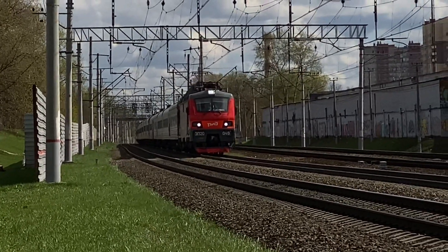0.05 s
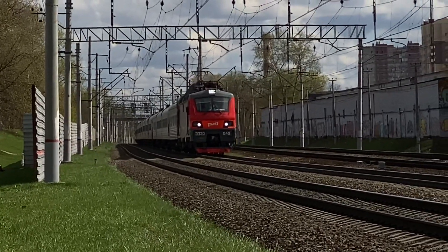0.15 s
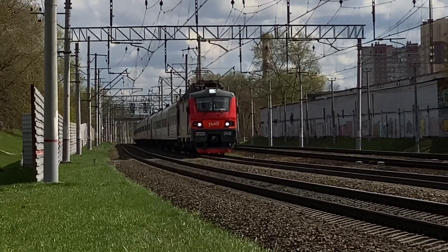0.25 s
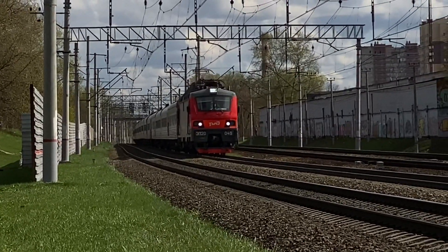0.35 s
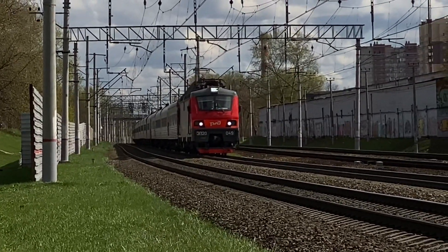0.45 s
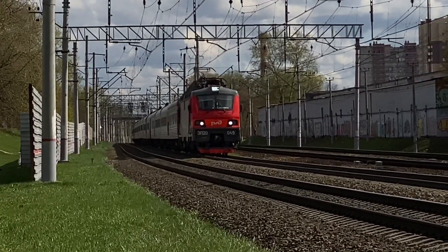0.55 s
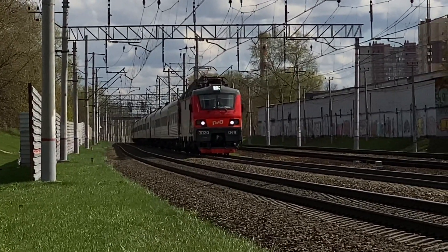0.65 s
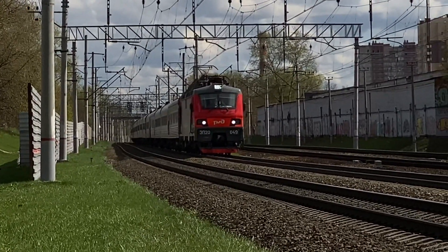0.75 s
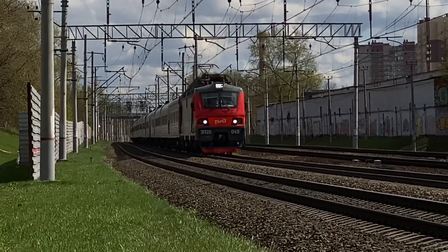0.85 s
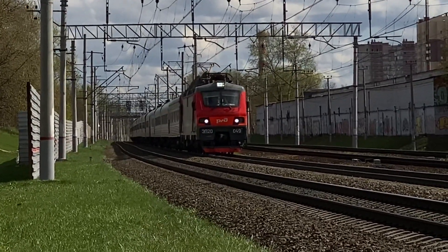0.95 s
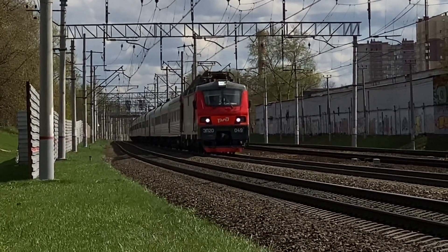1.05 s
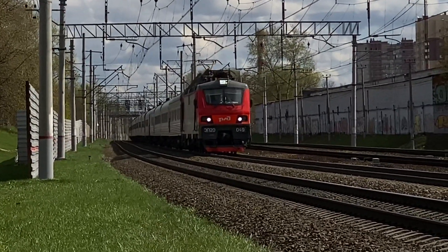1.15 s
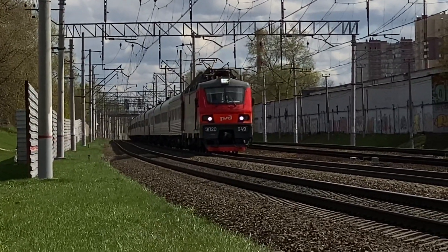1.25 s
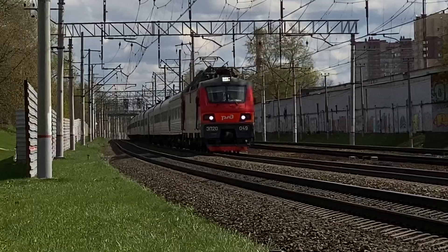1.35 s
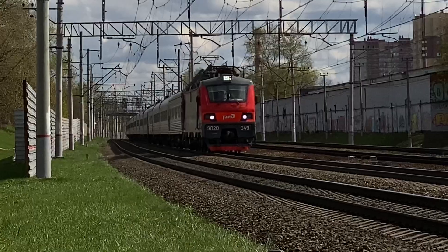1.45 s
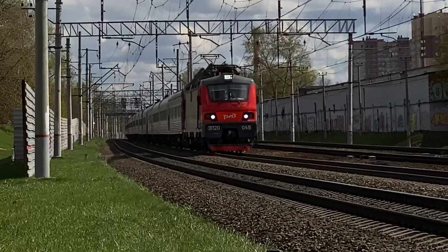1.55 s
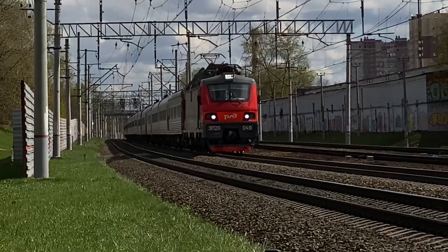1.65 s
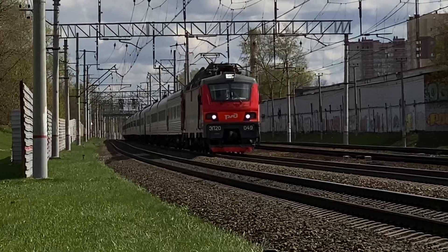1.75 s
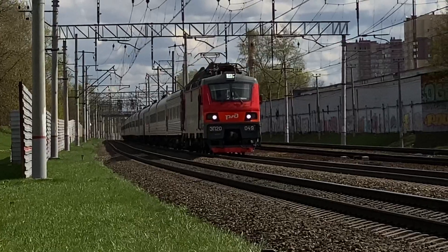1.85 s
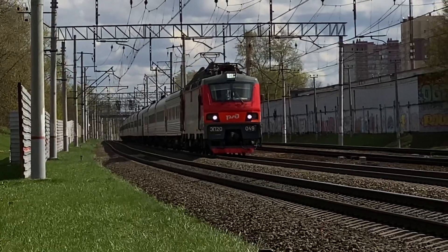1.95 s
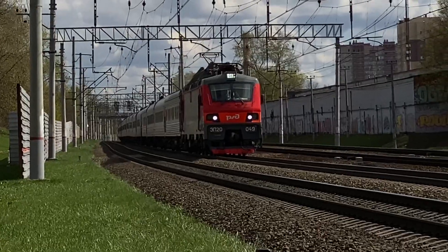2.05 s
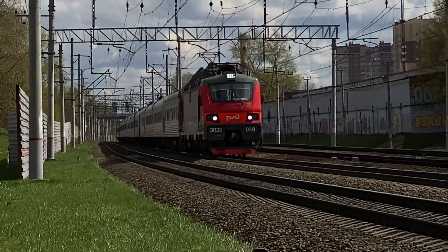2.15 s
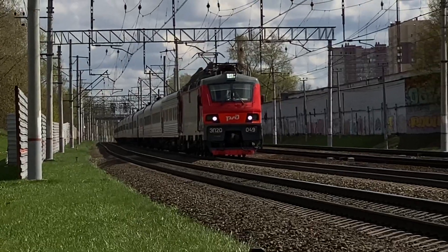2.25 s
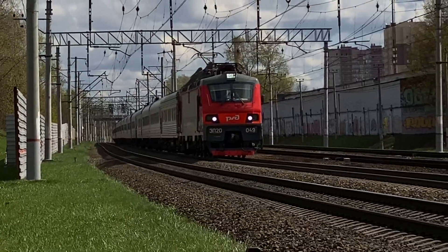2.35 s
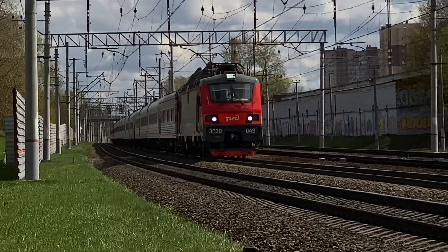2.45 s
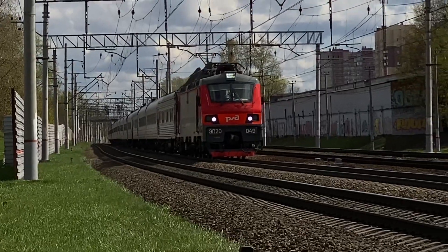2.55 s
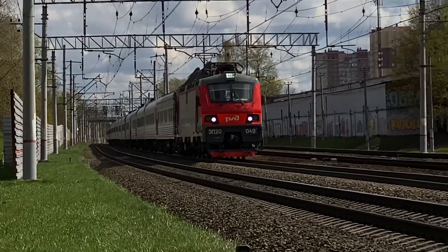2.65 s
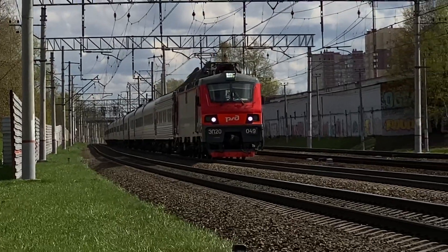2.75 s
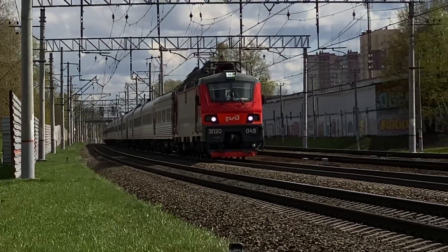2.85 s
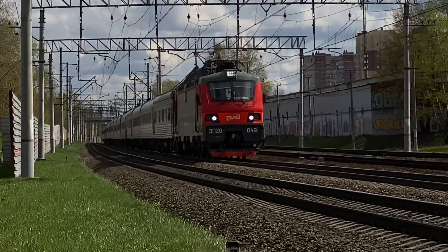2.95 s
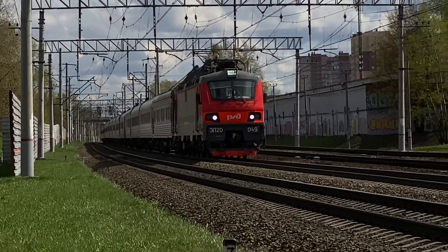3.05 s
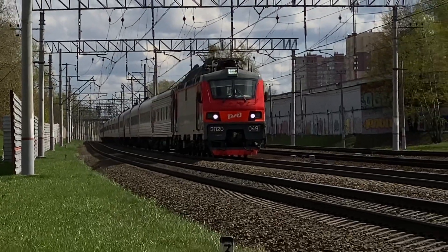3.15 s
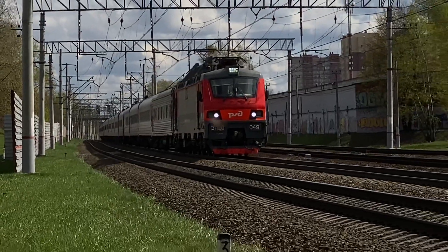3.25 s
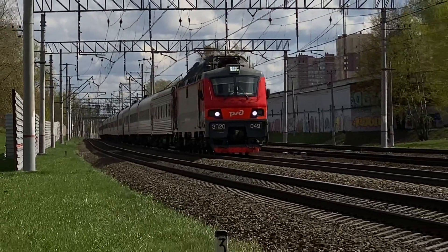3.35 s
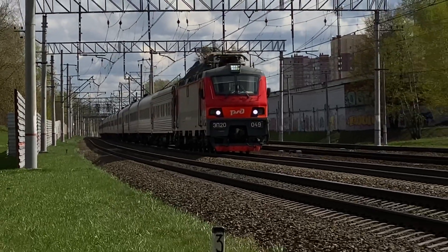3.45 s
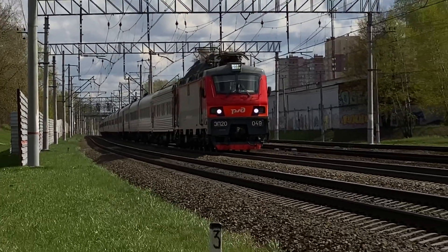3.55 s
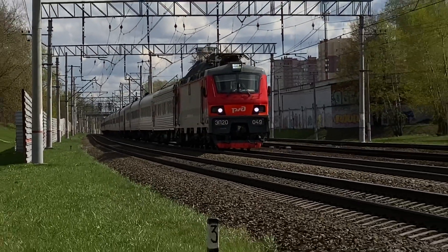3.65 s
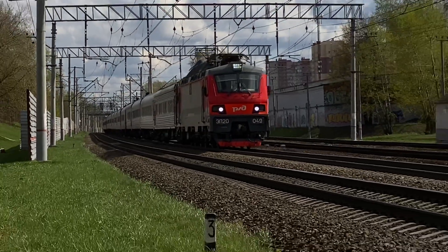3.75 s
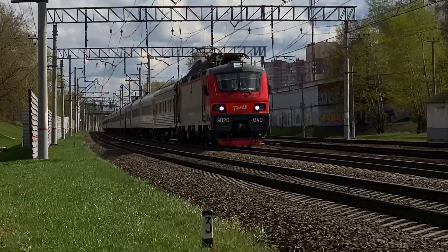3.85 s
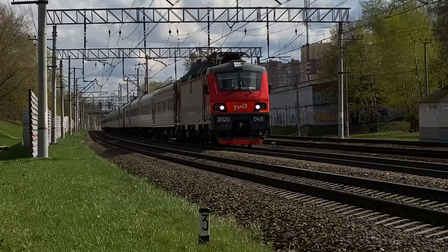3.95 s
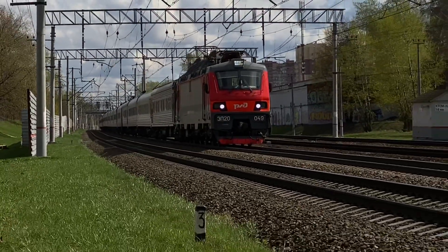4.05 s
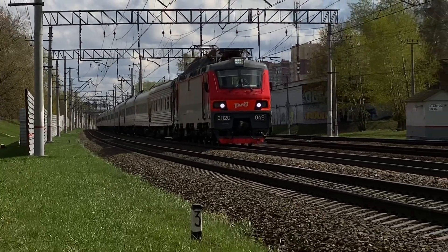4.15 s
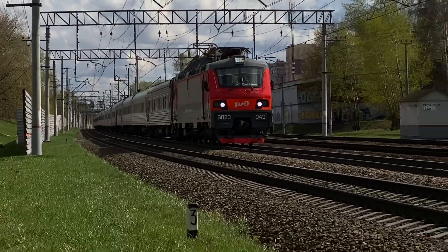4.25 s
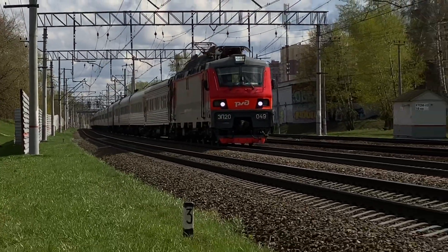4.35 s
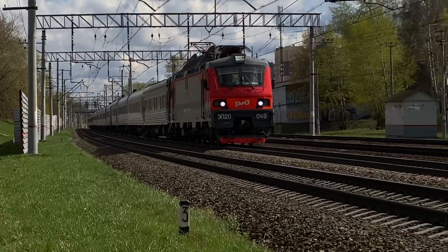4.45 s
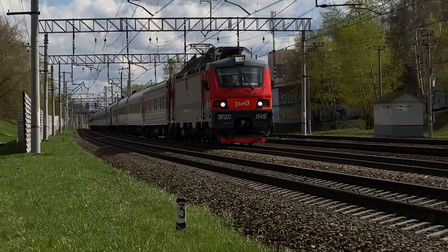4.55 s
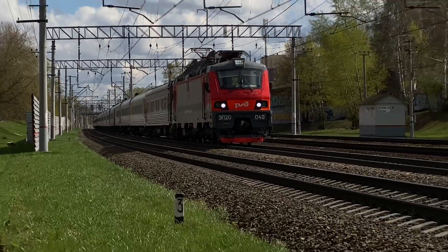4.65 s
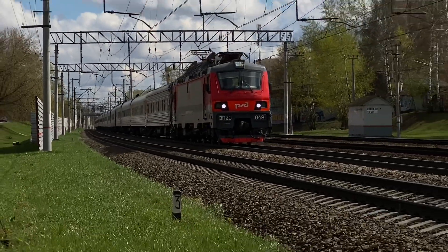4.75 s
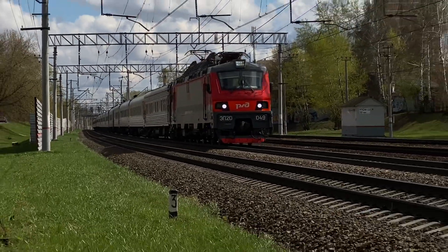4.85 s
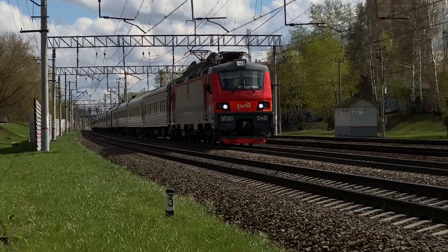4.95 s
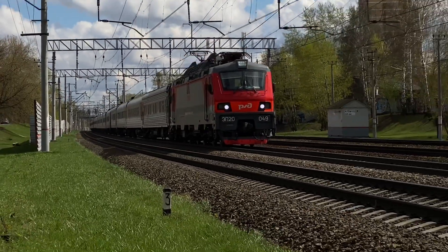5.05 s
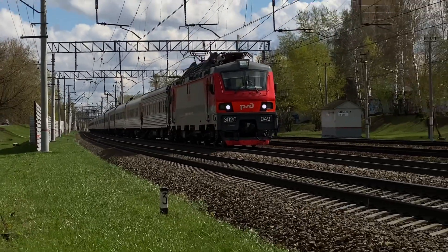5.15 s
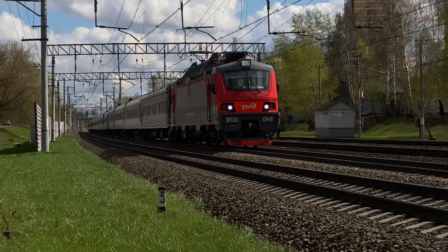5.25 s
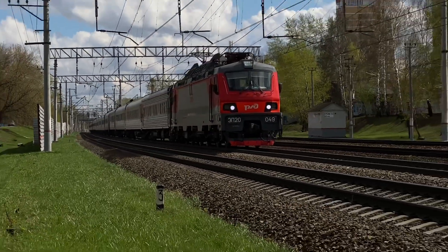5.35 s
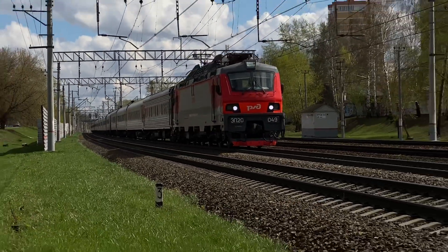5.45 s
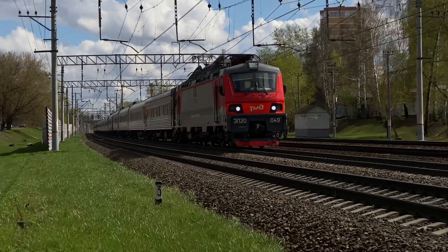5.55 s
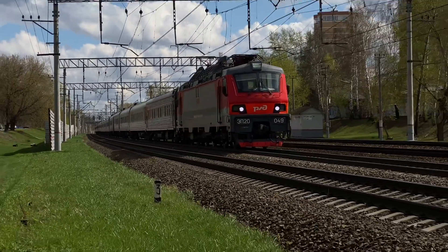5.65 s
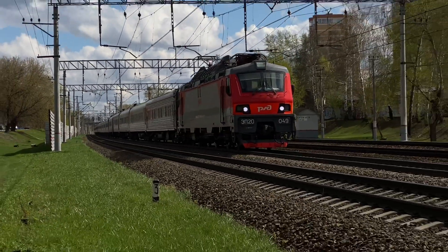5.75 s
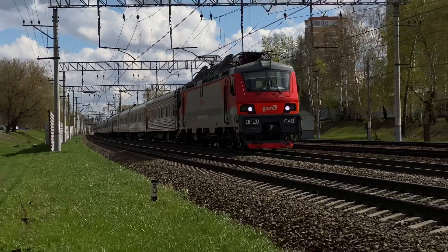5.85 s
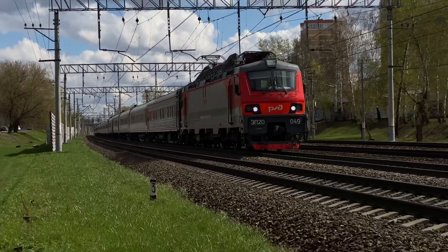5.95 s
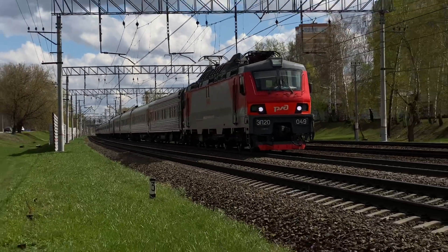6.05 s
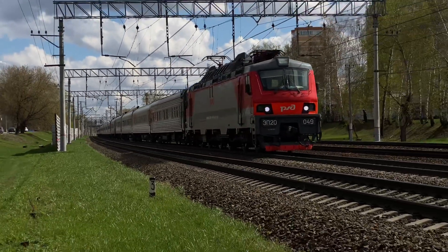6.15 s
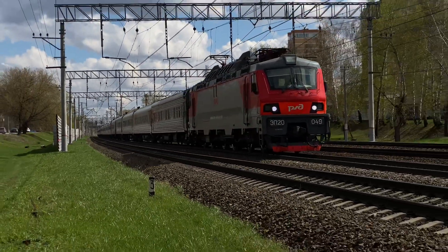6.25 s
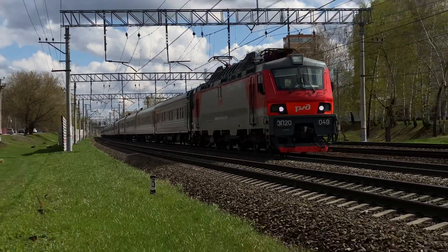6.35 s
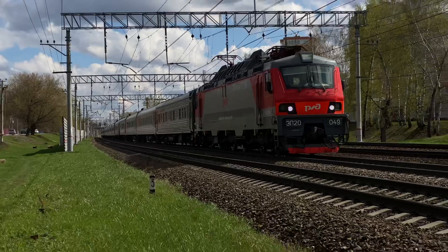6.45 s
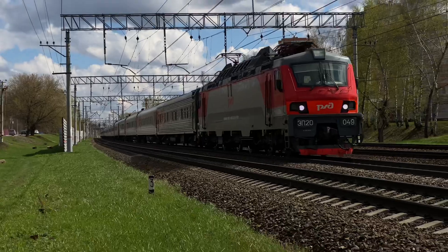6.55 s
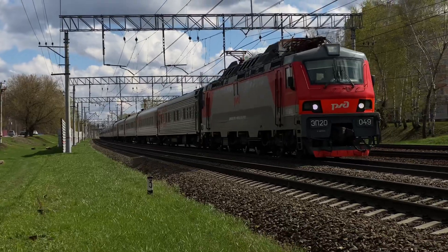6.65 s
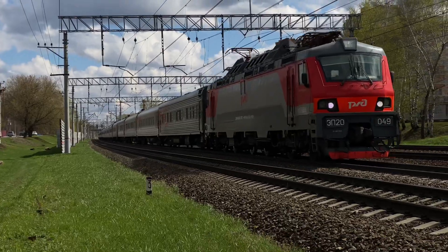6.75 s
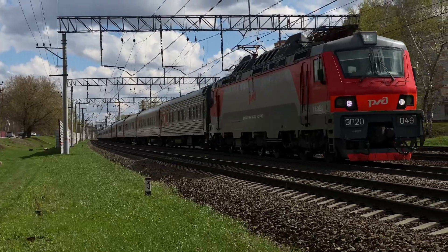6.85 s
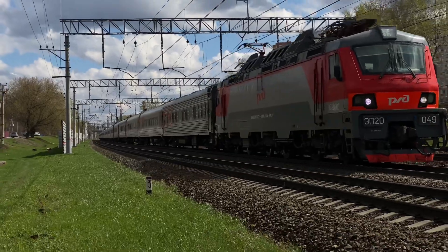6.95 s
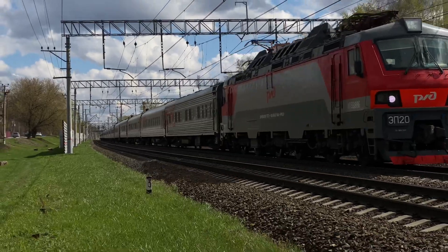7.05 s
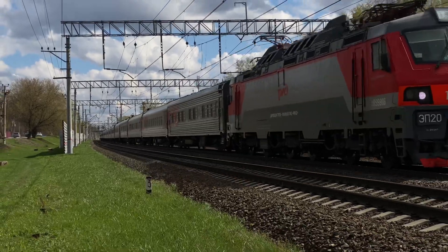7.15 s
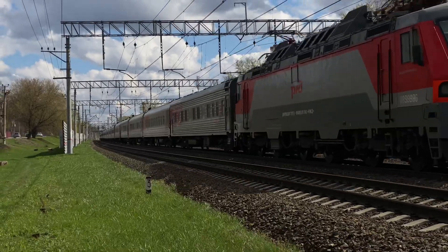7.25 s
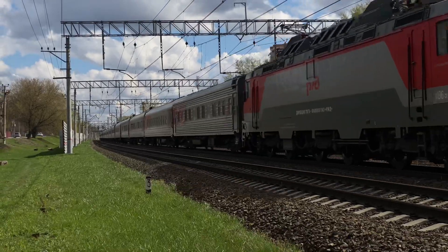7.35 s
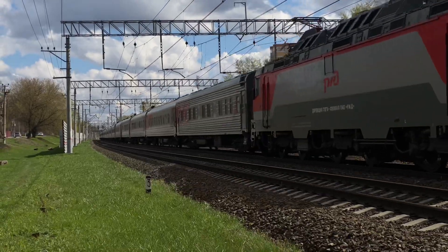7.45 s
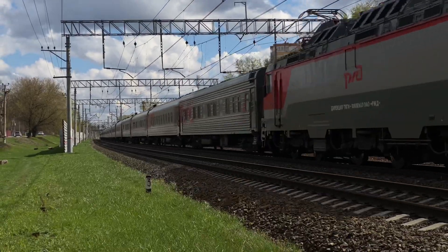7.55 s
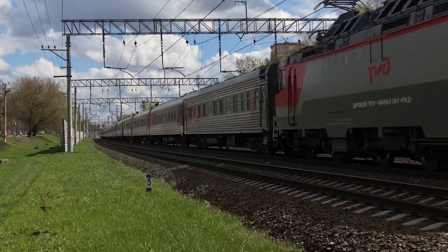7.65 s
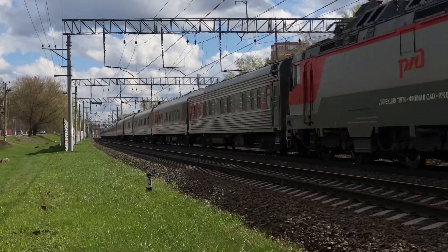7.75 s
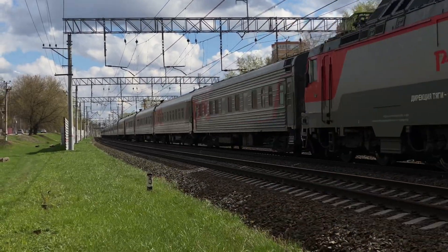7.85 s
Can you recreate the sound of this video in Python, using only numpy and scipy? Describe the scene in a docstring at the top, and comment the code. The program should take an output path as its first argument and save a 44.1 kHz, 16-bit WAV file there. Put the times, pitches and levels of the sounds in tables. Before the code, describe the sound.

An electric locomotive pulls a passenger train towards a listener standing beside the track outdoors. A faint, low rumble grows steadily, joined by a thin motor whine and ringing rails. Wheels drum deeply over the sleepers as it nears. Late on, the air horn gives one short, high, hissing blast with a brief echo. The rumble, wheel hiss and whine are at their fullest at the end, as the locomotive comes almost alongside.

```python
"""Electric train sounding its horn

An electric locomotive pulls a passenger train round a bend towards the listener. Its wheels shake the
track, the rails ring and hiss, the sleepers under them drum and the motor drive whines, ever nearer.
The air horn gives one short, high blast, which the ground, a wall and trees throw back."""
import sys
import numpy as np
from scipy import signal
from scipy.fft import rfft, irfft
from scipy.io import wavfile

SR = 44100
rng = np.random.default_rng(int(sys.argv[2]) if len(sys.argv) > 2 else 0)


def generate_wav(sig):
    """Save sig (samples, or channels by samples) to the path in sys.argv[1] as 16-bit PCM at SR."""
    pcm = np.round(np.clip(np.atleast_2d(sig).T, -1, 1) * 32767).astype(np.int16)
    wavfile.write(sys.argv[1], SR, pcm)


N = 348875
T = np.arange(N) / SR
FREQ = np.maximum(np.arange(N // 2 + 1) * SR / N, 1)
SIDES = np.array([[1], [-1]])  # plus for left, minus for right

# Tone colour of the rolling noise, far off and close by. Each row: frequency in Hz, relative level in dB.
FAR_COLOUR = [(20, -34.5), (40, -2), (65, 1), (110, 0), (210, -8.3), (370, -15.3), (520, -24), (700, -22),
              (900, -21), (1050, -30.5), (1800, -41.5), (3000, -55), (4500, -71), (12000, -94.5)]
NEAR_COLOUR = [(20, -35), (42, -9), (70, 0), (115, -2.5), (230, -9.5), (380, -16.5), (520, -14.8),
               (880, -10.5), (1200, -31), (2100, -35), (3800, -48.5), (7500, -58.5), (8600, -65.5),
               (11800, -69.5), (13500, -85.5)]
# Stereo width of the noise. Each row: frequency in Hz, level of the sides against the middle in dB.
STEREO_WIDTH = [(60, -13), (140, -14.5), (250, -17.5), (500, -6.5), (800, -3), (1200, 0), (1700, -6),
                (2400, -12.5), (3500, -13), (7000, -16), (8800, -2), (12000, -16)]
# How each part grows as the train nears. Each holds: locomotive level alongside in dB, its drop in dB
# at ten times the distance, coach level in dB, metres within which that level holds,
# its drop in dB per metre beyond, loss behind the bend in dB.
GROUND = (-36, 20, -25.6, 28, .131, 7.5)
WHEEL_FRAMES = (-25.7, 28, -37.2, 83, .155, 6.5)
WHEEL_RING = (-24.5, 30.5, -49.5, 50, .012, 5.5)
WHEEL_CONTACT = (-39, 25.5, -66.5, 50, .025, 0)
DRIVE_LOW = (-28, 35, -53.5, 50, .07, 11)
DRIVE_HIGH = (-32, 27, -57.5, 50, .012, 3.5)
# The horn's tones. Each row: multiple of the pitch, relative dB at full pressure and at low pressure.
HORN_PARTIALS = [(1, 1.5, -5.5), (2, -17.5, -21), (3, -12, -2), (4, -19, -15), (5, -25, -8), (6, -30, -16),
                 (7, -33, -25)]
# Hiss of the horn's air jet. Each row: frequency in Hz, relative level in dB.
JET_COLOUR = [(400, -16), (750, 7.5), (1200, -2.5), (2200, 0.5), (3200, -0.3), (4300, 1), (6000, -1.7),
              (8200, 1.5), (9700, -7.8), (11300, -2.5), (12600, -16.5), (15700, -11)]
# Where the horn's pipe rings. Each row: frequency in Hz, width in Hz, level against the jet in dB.
PIPE_RESONANCES = [(765, 45, -2), (1560, 70, -16), (2090, 130, -10), (2760, 70, -13.5), (4180, 110, -11.5),
                   (4930, 120, -12)]
# Horn echoes off the ground and wall. Each row: delay in seconds, level against the horn in dB.
ECHOES = [(.016, -19), (.072, -15.5), (.14, -27.5)]
# The horn reaches the left side first. Each row: frequency in Hz, lead in radians.
LEFT_LEAD = [(100, 0.067), (700, .7), (2100, 0.51), (4800, 0.51), (7600, 0), (8300, 1.45), (9600, 1.37),
             (11000, 0.63), (15000, 1.9)]
# Pitch of the drive's whine. Each row: time in seconds, pitch in Hz.
DRIVE_PITCH = [(0, 453), (2.4, 460), (5.8, 467.7), (7.91, 468)]
# Overtones of the whine. Each row: multiple of the pitch, relative dB far off and close by.
DRIVE_OVERTONES = [(2, -3, -0.5), (3, -25, -24), (4, -23, -18.5), (5, -35, -16.5)]
# The whine swells and fades near the end. Each row: time in seconds, change of its lowest tone in dB.
DRIVE_SWELL = [(6.7, 0), (6.98, -1), (7.1, 8.5), (7.22, -8), (7.4, 1), (7.5, 7.5), (7.66, 6), (7.76, -13),
               (7.87, 6)]
# Axles drumming over the sleepers. Each row: time in seconds, bumps per second, level in dB.
SLEEPER_DRONE = [(0, 66, -65), (1.2, 65, -45.5), (3.95, 64, -44), (4.17, 63.4, -37.5), (5.35, 61.8, -34),
                 (5.87, 60.5, -23), (6.1, 59.5, -28), (6.42, 59, -21.3), (6.65, 59, -35), (7.91, 58.5, -41)]
# Thuds under the train. Each row: start in seconds, level in dB before fading, rise and fade in seconds.
THUDS = [(.42, -38.5, .16, .11), (1.37, -34, .012, .035), (6.546, -16.5, .002, .022), (7.21, -20, .07, .13)]
# Where the rails ring. Each row: frequency in Hz, rough width in Hz, relative dB, left minus right in dB.
RAIL_RESONANCES = [(505, 140, -3, 7.5), (740, 250, -2, 4), (945, 190, -3.5, -1.5), (1195, 230, -5.5, -8.5),
                   (3650, 770, -29.5, -0.5), (5800, 3200, -37, 0)]
# Loudness of the singing rails. Each row: time in seconds, level in dB.
RAIL_LEVEL = [(0, -77.5), (1.5, -61), (3, -61), (4.5, -54.5), (5.25, -49), (5.5, -42.3), (6.4, -40.5),
              (7, -43), (7.4, -43), (7.91, -44)]
# Tones of the cooling fans and gears. Each row: pitch in Hz, relative level in dB.
FAN_TONES = [(188, -36), (220.7, -32), (283, -41), (608, -38.5), (866, -43), (1507, -55), (2099, -58.5)]

SPEED_M_S, ALONGSIDE_S, TRACK_DISTANCE_M = 25, 8.0, 9
BEND_S, BEND_WIDTH_S = 1.03, .12  # when and how gradually the train comes out of the bend
HORN_OPEN_S, HORN_SHUT_S, HORN_EMPTY_S = 6.4795, 6.775, 6.88
# How quickly the horn starts, its pressure builds, its pressure falls and its last air dies away.
SPEAK_S, BUILD_S, RELEASE_S, DIE_S = .011, .017, .04, .014
HORN_HZ, DRIFT_HZ_PER_S, SAG_HZ = 701.5, 17, 47
OVERSHOOT_HZ, OVERSHOOT_PEAK_S, OVERSHOOT_WIDTH_S = 52, .018, .026
# Base levels of the full tone, the dying tone and the hiss; how fast the hiss falls after the valve shuts.
HORN_DB, LAST_AIR_DB, JET_DB, JET_FALL_DB_PER_S = -18.6, -44, -33, 215


def wheels_on_track(alongside_pan_db=-4.5, rumble_dip_db=-4.5):
    """Wheels shake the ground and their frames, ring and hiss; up close the ringing moves right."""
    alongside = (TRACK_DISTANCE_M / distance()) ** 2
    pan_db = alongside_pan_db * alongside
    ground_db = approach_db(GROUND) + rumble_dip_db * alongside
    ground = rolling_band(15, 179, ground_db, flutter_db=1.25, flutter_hz=3.6)
    frames = rolling_band(174, 450, approach_db(WHEEL_FRAMES), flutter_db=1.1, flutter_hz=4)
    ringing = rolling_band(450, 1250, approach_db(WHEEL_RING), flutter_db=.97, flutter_hz=14)
    contact = rolling_band(1290, 16000, approach_db(WHEEL_CONTACT), flutter_db=.93, flutter_hz=14)
    return ground + frames + ringing * undb(SIDES * pan_db / 2) + contact


def rolling_band(low_hz, high_hz, db, flutter_db, flutter_hz):
    """One band of rolling noise: it brightens as the train nears, and rough rails make it flutter."""
    band = 1 / np.sqrt((1 + (low_hz / FREQ) ** 16) * (1 + (FREQ / high_hz) ** 16))
    close = closeness()
    far, near = (wide_noise(band * undb(over_frequency(colour))) for colour in (FAR_COLOUR, NEAR_COLOUR))
    return (np.sqrt(1 - close) * far + np.sqrt(close) * near) * undb(db + flutter_db * wander(flutter_hz))


def horn(jet_db=-.7, jitter=.003, shake_db=.7, spray_db=-11):
    """Air under pressure sounds a high note, hisses out and makes the horn's pipe ring hoarsely."""
    hz, tone_gain, air_gain, pressure = horn_valve()
    phase = 2 * np.pi * np.cumsum(hz * (1 + jitter * wander(70))) / SR
    voice = 0
    for k, full_db, low_db in HORN_PARTIALS:
        # swirling air shakes the higher tones most
        db = low_db + pressure * (full_db - low_db) + shake_db * k * wander(52)
        voice = voice + np.sqrt(2) * np.sin(k * phase) * undb(db)
    jet_colour = undb(over_frequency(JET_COLOUR))
    hiss = noise(jet_colour) * (1 + .3 * np.sin(phase)) * undb(jet_db + .66 * wander(40))
    pipe = sum(noise(1 / (1 + ((FREQ - centre) / (width / 2)) ** 2)) * undb(db)
               for centre, width, db in PIPE_RESONANCES)
    blast = voice * tone_gain + (hiss + pipe * pressure) * air_gain
    echoed, tail = outdoor_echoes(blast, tail_db=-25.5, fade_s=1.4, top_hz=1400)
    pan_db = -1.1 / (1 + (FREQ / 2500) ** 2)
    lead = np.exp(.5j * SIDES * over_frequency(LEFT_LEAD))
    stereo = irfft(rfft(echoed) * lead * undb(SIDES * pan_db / 2), N)
    spray = SIDES * noise(jet_colour) * undb(spray_db) * air_gain  # hiss scattered by the track's stones
    return stereo + spray + tail


def horn_valve():
    """The valve opens and the pitch briefly overshoots; it shuts, and pressure and pitch sag."""
    age, since_shut, since_empty = (np.maximum(T - s, 0) for s in (HORN_OPEN_S, HORN_SHUT_S, HORN_EMPTY_S))
    supply = np.exp(-(since_shut / RELEASE_S) ** 2)
    gate = (1 - np.exp(-(age / SPEAK_S) ** 2)) * np.exp(-since_empty / DIE_S)
    overshoot = OVERSHOOT_HZ * np.exp(-((age - OVERSHOOT_PEAK_S) / OVERSHOOT_WIDTH_S) ** 2)
    hz = HORN_HZ + overshoot + DRIFT_HZ_PER_S * (age - since_shut) - SAG_HZ * (1 - supply)
    tone_gain = gate * (undb(HORN_DB) * supply + undb(LAST_AIR_DB) * (1 - supply))
    air_gain = gate * undb(JET_DB - JET_FALL_DB_PER_S * since_shut)
    pressure = supply * (1 - np.exp(-(age / BUILD_S) ** 2))
    return hz, tone_gain, air_gain, pressure


def outdoor_echoes(sound, tail_db, fade_s, top_hz):
    """Ground and wall add echoes; trees scatter a dull tail that drops 60 dB in fade_s."""
    echoes = sum(undb(db) * np.interp(T - delay, T, sound, left=0) for delay, db in ECHOES)
    dull = 1 / (1 + (FREQ / top_hz) ** 2)
    envelope = np.exp(-np.log(1000) * T / fade_s) * (1 - np.exp(-T / .018))
    tails = np.array([noise(dull) for _ in range(2)]) * envelope
    tails = tails / np.sqrt(np.sum(tails[0] ** 2))
    return sound + echoes, undb(tail_db) * signal.fftconvolve(sound[None], tails, axes=1)[:, :N]


def drive_whine(side_share=.3, overtone_swell=.35):
    """The motor drive whines in a stack of tones, blurred by echoes while far off."""
    hz, swell_db, close = over_time(DRIVE_PITCH)[0], over_time(DRIVE_SWELL)[0], closeness()
    low_db = approach_db(DRIVE_LOW) + swell_db
    high_db = approach_db(DRIVE_HIGH) + overtone_swell * swell_db
    overtones = [(k, high_db + far + close * (near - far)) for k, far, near in DRIVE_OVERTONES]
    echo_gain = 1.05 * (1 - close) + side_share * SIDES
    out = 0
    for k, db in [(1, low_db)] + overtones:
        direct = wavering_tone(k * hz, scatter=.31, rate_hz=8.1) * .57 * (1 + close)
        # the train's motion raises the pitch less along slanting echo paths
        scattered = wavering_tone(k * hz * .988, scatter=3.6, rate_hz=12)
        out = out + (direct + echo_gain * scattered) * undb(db)
    return out


def sleepers():
    """Each sleeper, a beam under the rails, bumps the passing axles: a deep, unsteady drone."""
    hz, db = over_time(SLEEPER_DRONE)
    return wavering_tone(hz, scatter=.15, rate_hz=3) * undb(db)


def thuds(low_hz=66, top_hz=210):
    """The wheels and their frames give a few dull, low thuds."""
    out = 0
    for start, db, rise_s, fade_s in THUDS:
        age = np.maximum(T - start, 0)
        body = noise(FREQ ** 2 / (FREQ ** 2 + low_hz ** 2) / (1 + (FREQ / top_hz) ** 8))
        out = out + body * undb(db) * (1 - np.exp(-age / rise_s)) * np.exp(-age / fade_s)
    return out


def singing_rails(shared_db=-5, flutter_db=.5):
    """Bending waves run along the rails ahead of the train, heard mostly out of step left and right."""
    out = 0
    for hz, width, db, pan_db in RAIL_RESONANCES:
        resonance = 1 / (1 + ((FREQ ** 2 - hz ** 2) / (FREQ * width * .94)) ** 2)
        ringing = undb(shared_db) * noise(resonance) + SIDES * noise(resonance)
        out = out + ringing * undb(db + SIDES * pan_db / 2 + flutter_db * wander(9.8))
    return unit_level(out) * undb(over_time(RAIL_LEVEL)[0])


def fans(alongside_db=2.5, tenfold_drop_db=29):
    """Fans and gears sound from the locomotive's sides, so they are heard only in the last metres."""
    level_db = alongside_db - tenfold_drop_db * np.log10(distance() / TRACK_DISTANCE_M)
    hum = sum(wavering_tone(hz, scatter=.55, rate_hz=6.5) * undb(db) for hz, db in FAN_TONES)
    return hum * undb(level_db)


def faint_hiss():
    """A very quiet, even hiss behind everything."""
    return undb(-99) * wide_noise(1 / (1 + (FREQ / 11000) ** 4))


def distance():
    """Metres from the locomotive to the listener."""
    return np.hypot(SPEED_M_S * (ALONGSIDE_S - T), TRACK_DISTANCE_M)


def closeness(halfway_m=35, steepness=6, least=.03, most=.87):
    """How much of the close-by colour is heard, on a scale of 0 to 1."""
    return least + (most - least) / (1 + (distance() / halfway_m) ** steepness)


def approach_db(part):
    """The locomotive looms at the end, the coaches swell slowly; the bend screens both at first."""
    engine_db, tenfold_drop_db, coaches_db, reach_m, drop_db_per_m, bend_db = part
    metres = distance()
    engine = undb(engine_db - tenfold_drop_db * np.log10(metres / TRACK_DISTANCE_M))
    coaches = undb(coaches_db - drop_db_per_m * np.maximum(metres - reach_m, 0))
    hidden = (1 - np.tanh((T - BEND_S) / BEND_WIDTH_S)) / 2
    return 20 * np.log10(np.hypot(engine, coaches)) - bend_db * hidden


def wavering_tone(hz, scatter, rate_hz):
    """A tone heard directly and along shifting paths, which make it swell and fade."""
    phase = 2 * np.pi * np.cumsum(hz * np.ones(N)) / SR
    in_step = (1 + scatter * wander(rate_hz)) * np.sin(phase)
    out_of_step = scatter * wander(rate_hz) * np.cos(phase)
    return unit_level(in_step + out_of_step)


def wide_noise(gain):
    """Stereo noise from a source spread along the track."""
    side = gain * undb(over_frequency(STEREO_WIDTH))
    return noise(gain) + SIDES * noise(side) * np.sqrt(np.sum(side ** 2) / np.sum(gain ** 2))


def wander(rate_hz):
    """A smooth random wobble that moves up to about rate_hz times a second."""
    return noise(np.exp(-(FREQ / rate_hz) ** 2 / 2))


def noise(gain):
    """Noise of level 1, shaped by a gain for each frequency."""
    return unit_level(irfft(rfft(rng.standard_normal(N)) * gain, N))


def over_time(table):
    """Join a table's timed rows into one curve per value column."""
    times, *columns = np.transpose(table)
    return [np.interp(T, times, column) for column in columns]


def over_frequency(table):
    """Join rows of frequency and value into a curve, giving each octave equal room."""
    hz, value = np.transpose(table)
    return np.interp(np.log(FREQ), np.log(hz), value)


def unit_level(x):
    """Scale to an average (rms) level of 1."""
    return x / np.sqrt(np.mean(x ** 2))


def undb(db):
    """Turn decibels into a gain."""
    return 10 ** (np.asarray(db) / 20)


def scene():
    """The nearing train and its horn over a faint hiss."""
    rolling = faint_hiss() + wheels_on_track() + singing_rails() + sleepers() + thuds()
    return rolling + drive_whine() + fans() + horn()


def record(dry, top_hz=15800):
    """A steep filter cuts the highest treble."""
    return signal.sosfilt(signal.ellip(10, .1, 80, top_hz, fs=SR, output="sos"), dry)


dry = scene()
out = record(dry)
generate_wav(out)
```